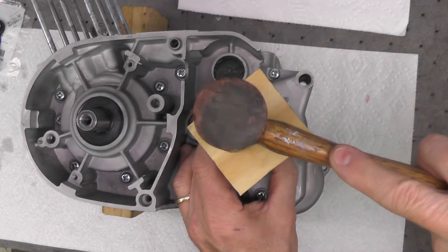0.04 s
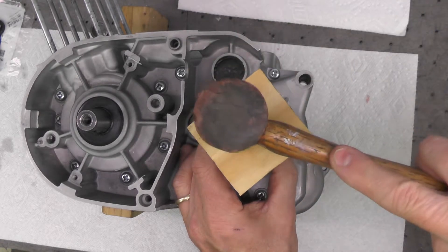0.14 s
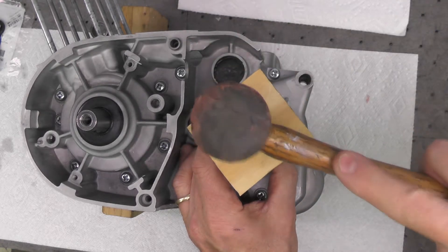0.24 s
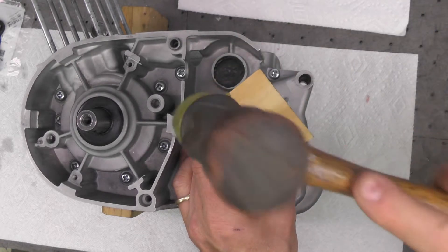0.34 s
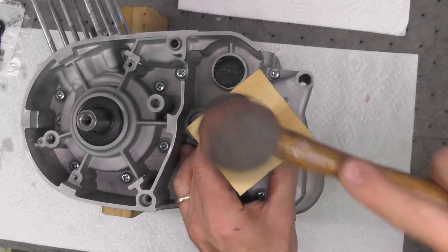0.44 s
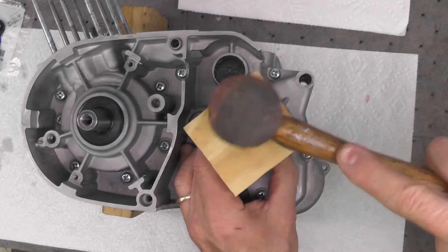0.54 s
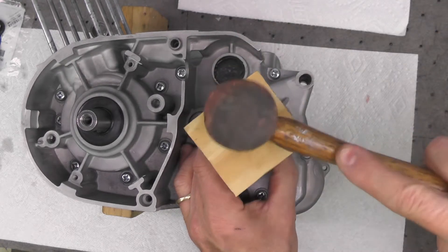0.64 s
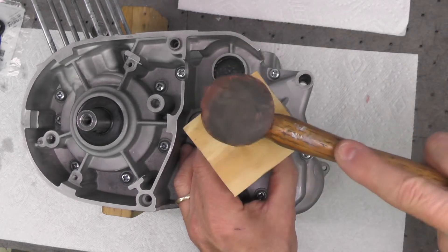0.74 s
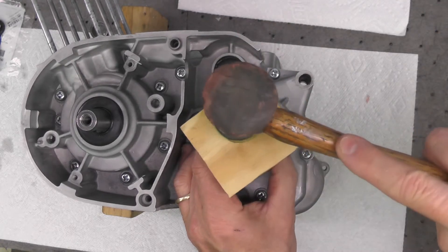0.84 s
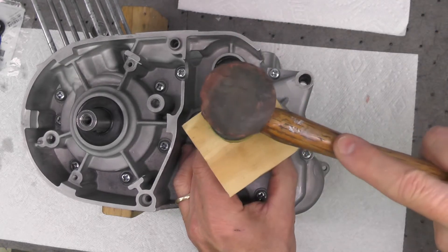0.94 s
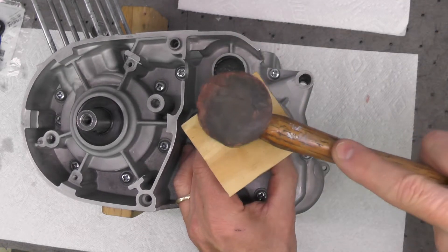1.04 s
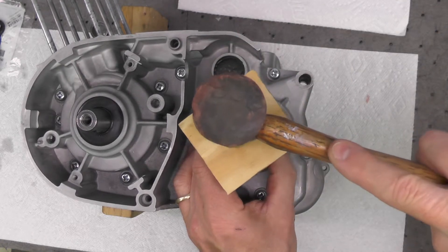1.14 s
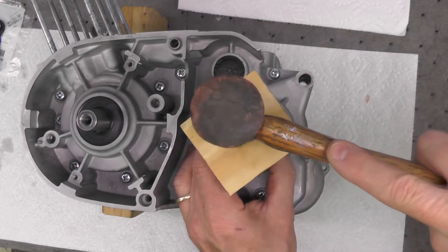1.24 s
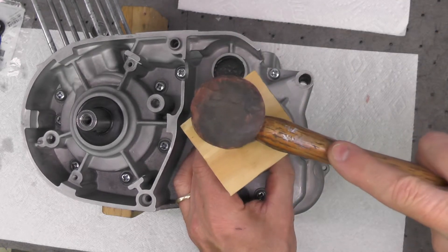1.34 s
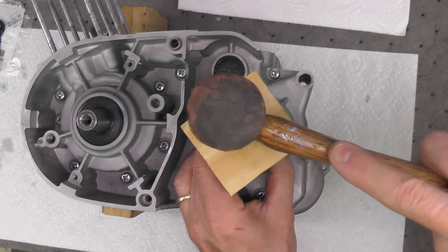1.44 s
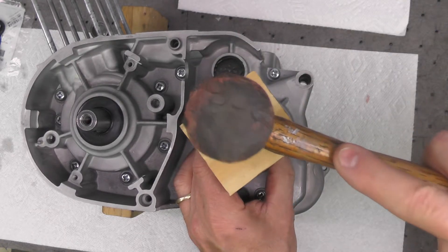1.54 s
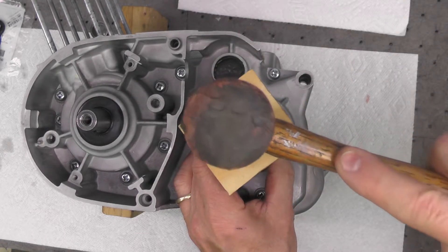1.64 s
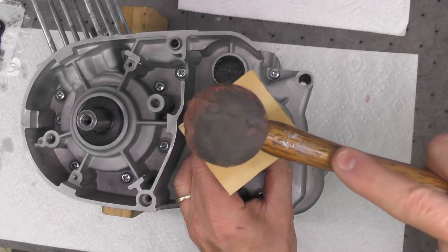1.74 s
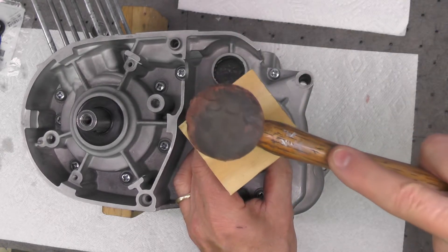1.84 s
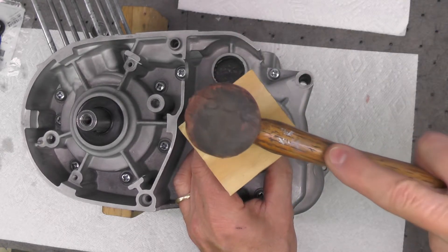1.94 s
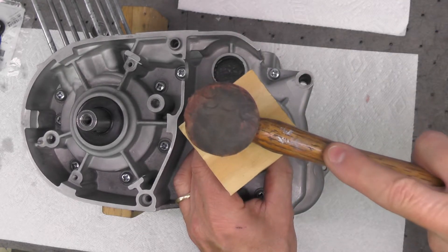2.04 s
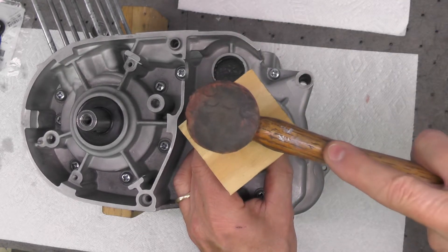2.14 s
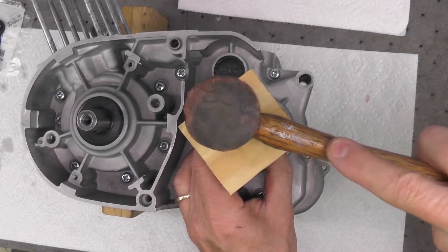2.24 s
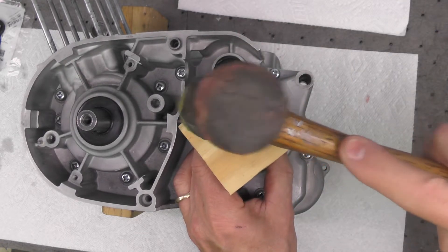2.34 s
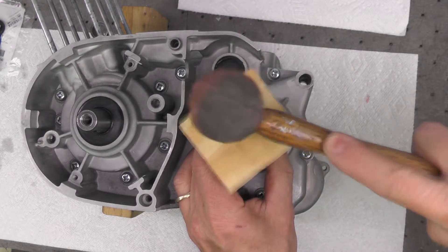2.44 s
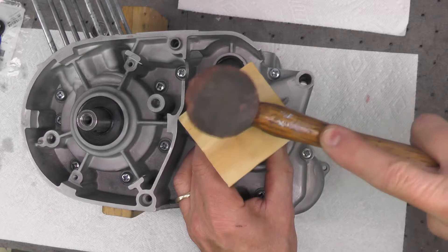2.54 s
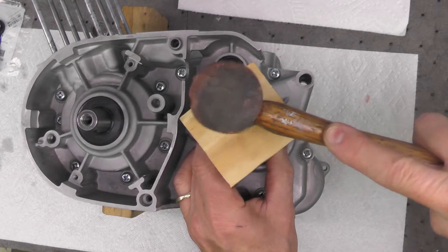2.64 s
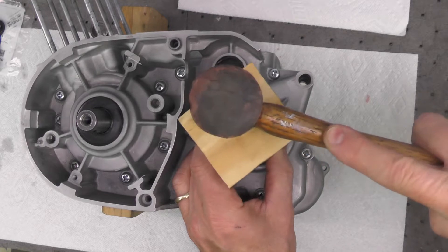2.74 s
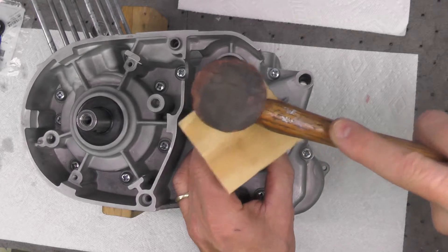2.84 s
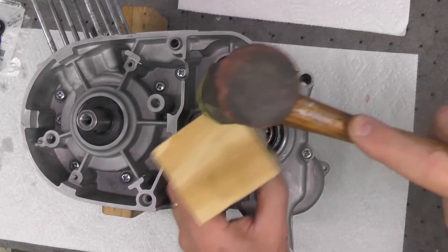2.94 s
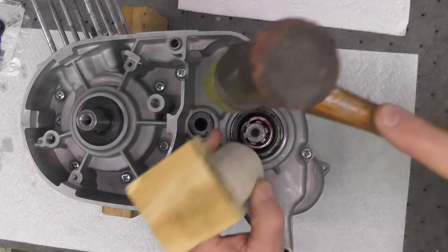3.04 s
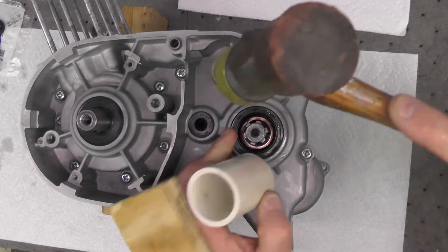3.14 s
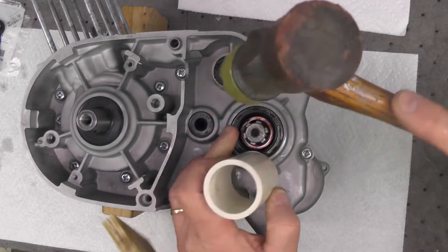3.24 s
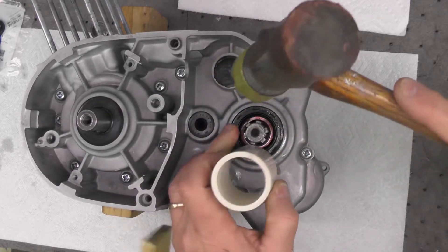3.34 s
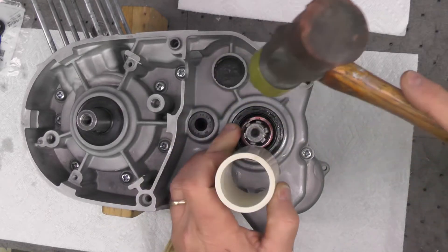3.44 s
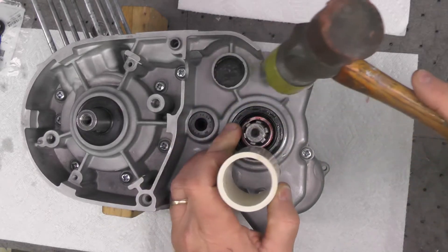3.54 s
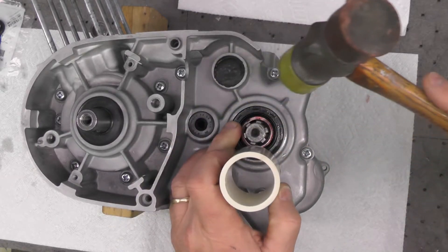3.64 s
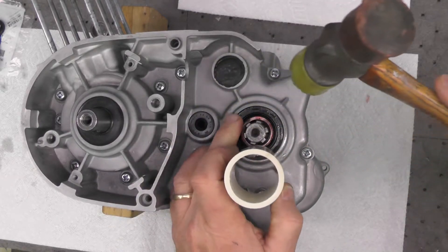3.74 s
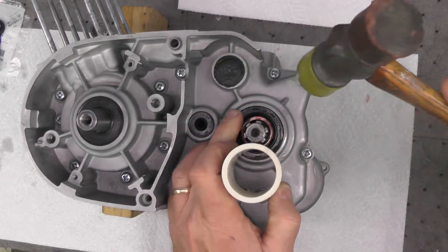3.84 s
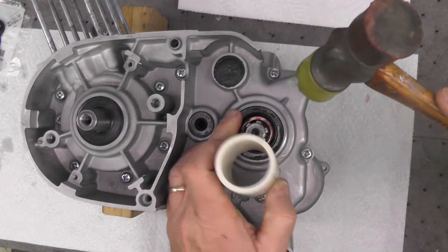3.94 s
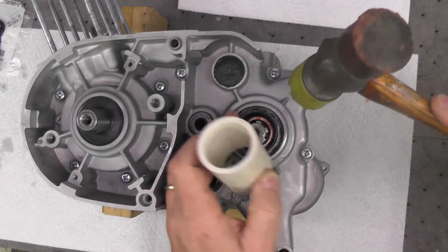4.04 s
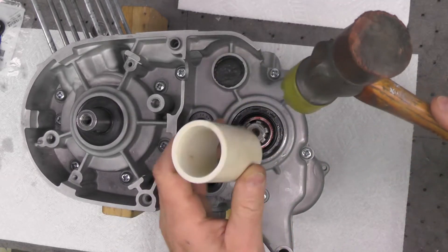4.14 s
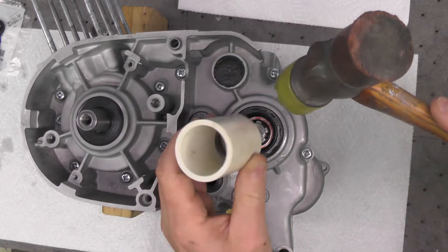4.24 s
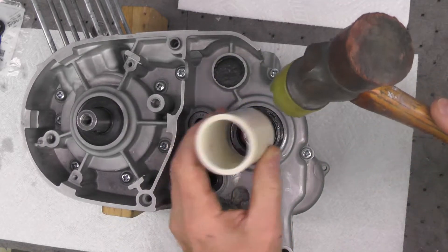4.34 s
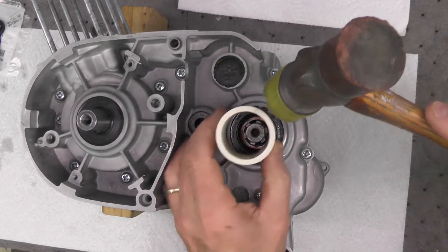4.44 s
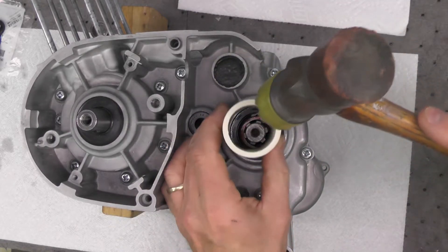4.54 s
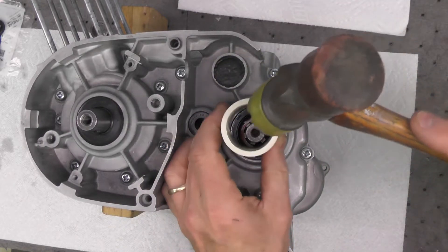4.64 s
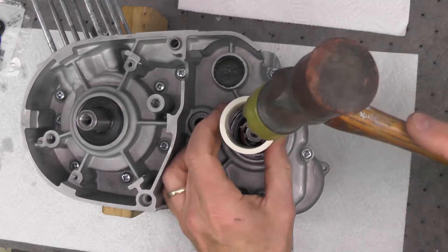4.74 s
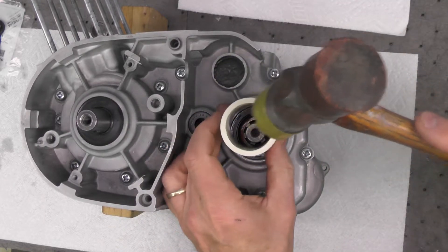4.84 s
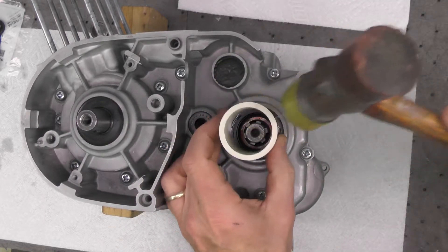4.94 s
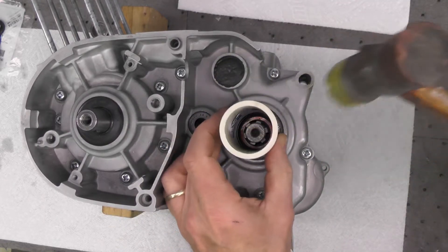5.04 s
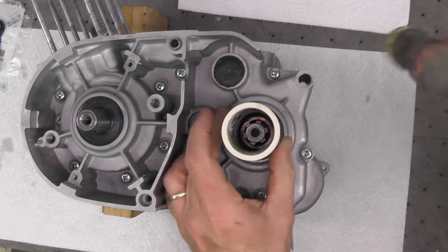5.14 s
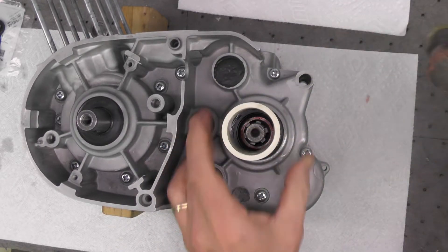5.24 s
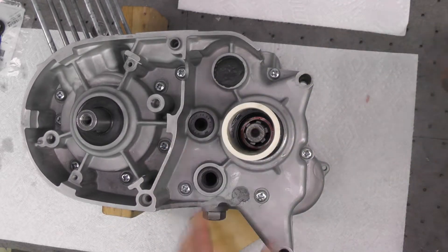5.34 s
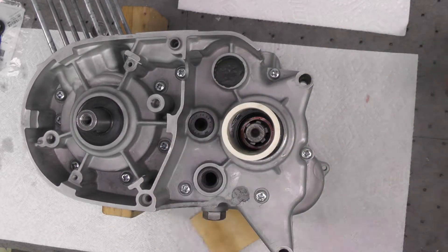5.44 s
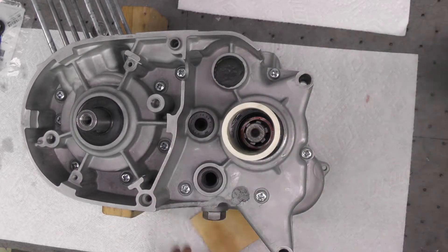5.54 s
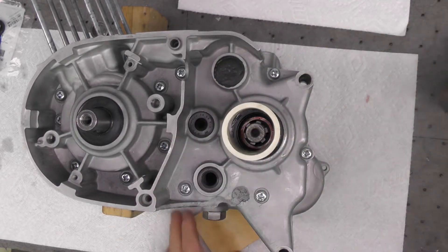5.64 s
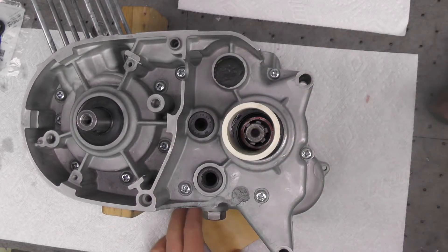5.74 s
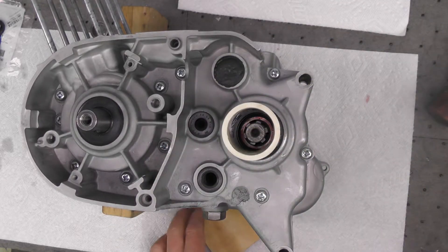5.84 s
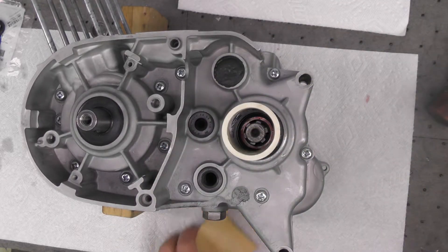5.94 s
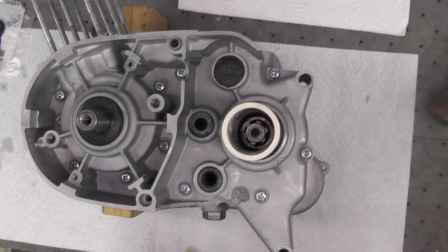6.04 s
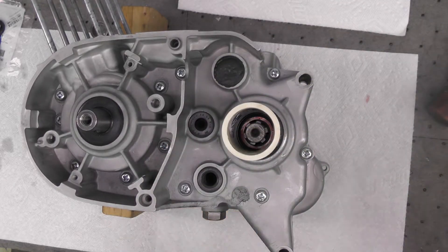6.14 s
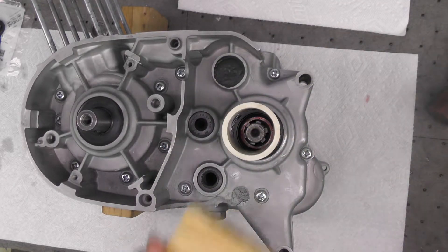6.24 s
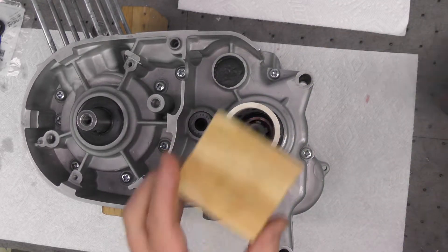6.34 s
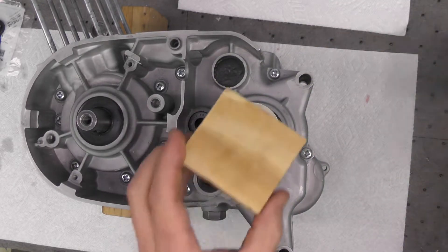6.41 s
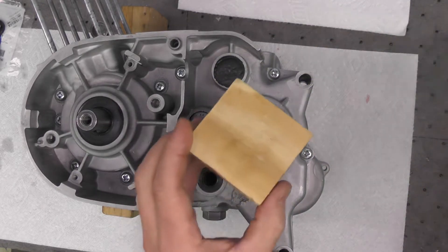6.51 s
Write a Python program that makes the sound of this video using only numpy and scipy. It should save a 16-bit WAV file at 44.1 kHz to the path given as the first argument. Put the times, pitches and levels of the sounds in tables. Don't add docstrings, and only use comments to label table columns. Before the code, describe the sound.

Sharp, chattering mallet strikes through wood onto cast metal, followed by a dropped block, hollow tube taps and faint rustles in a quiet, humming room.

```python
import sys
import numpy as np
from scipy import signal
from scipy.fft import rfft, irfft
from scipy.io import wavfile
from scipy.ndimage import uniform_filter1d

SR = 44100
rng = np.random.default_rng(int(sys.argv[2]) if len(sys.argv) > 2 else 0)


def to_wav(sig):
    pcm = np.clip(np.atleast_2d(sig), -1, 1) * 32767
    pcm = np.round(pcm).astype(np.int16)
    wavfile.write(sys.argv[1], SR, pcm.T)


def volts(x):
    e = np.asarray(x, float) / 20
    return 10 ** e


N = 289945


def evened(x):
    return x / np.sqrt(np.mean(x ** 2) + 1e-20)


def read(points, hz):
    f, value = np.transpose(points)
    return np.interp(np.log(hz + 1), np.log(f + 1), value)


def add(mix, s, sound):
    part = mix[max(round(s * SR), 0):][:len(sound)]
    part += sound[:len(part)]


def coloured(x, points):
    hz = np.fft.rfftfreq(x.shape[-1], 1 / SR)
    return irfft(rfft(x) * volts(read(points, hz)), x.shape[-1])


def band(x, hz, width):
    b, a = signal.iirpeak(min(hz, .45 * SR), hz / width, SR)
    return signal.lfilter(b, a, x)


def struck(modes, contact_ms, spread, count=14000):
    t = np.arange(count) / SR
    luck = rng.standard_normal((len(modes), 3))
    hz, db, t60 = np.transpose(modes)[:, :, None]
    waves = np.sin(2 * np.pi * hz * (1 + .003 * luck[:, 1:2]) * t) * np.sign(luck[:, 2:])
    ring = (volts(db + spread * luck[:, :1] - 60 * t / t60) * waves).sum(0)
    u = np.arange(400) / (SR * max(contact_ms, .03) / 1000)
    push = np.sin(np.pi * np.minimum(u + .1, 1))
    out = signal.oaconvolve(ring, push)[:count]
    return out / abs(out).max()


def crack(colour, t60):
    t = np.arange(8192) / SR
    grit = rng.standard_normal(len(t)) * volts(5 * rng.standard_normal(len(t)))
    return volts(-60 * t / t60) * evened(coloured(grit, colour))


def puff(colour):
    pulse = coloured(np.arange(1024) == 150, colour)
    return 10 * pulse / np.linalg.norm(pulse)


def boom(db, contact_ms):
    # [f/Hz, level/dB, t60/s]
    bench_modes = [(91.5, 1.5, 0.26), (95, -13.5, 0.19), (122.6, -7, 0.16), (151.6, -13.5, 0.32),
                   (215, -17, .12), (42, -17.5, 0.052)]
    t = np.arange(SR // 2) / SR
    hz, mode_db, t60 = np.transpose(bench_modes)[:, :, None]
    rise_s = 0.0077
    swell = 1 - np.exp(-(t / rise_s) ** 2)
    rings = volts(mode_db - 60 * t / t60) * np.sin(2 * np.pi * hz * (t - .001))
    bench = -swell * (rings * volts(-30 * hz * contact_ms / 1000)).sum(0)
    return volts(db) * bench / abs(bench).max()


def knock(db, contact_ms, spread):
    # [f/Hz, level/dB, t60/s]
    knock_modes = [(210, -10.5, 0.061), (306, -8, 0.032), (364, -6, 0.093), (430, -6.5, 0.11),
                   (498, -6.5, 0.057), (565.7, -1, 0.042), (634.5, -10.5, 0.06), (750, -4.5, .03),
                   (850, -14, 0.071), (1310, -2.5, 0.023), (1545, -6.5, 0.045), (2600, -7, .01)]
    # [f/Hz, level/dB]
    dull = [(100, -14.5), (220, -2), (350, 1), (650, -0.5), (850, -8.5), (1400, -13), (2500, -22.5),
            (6000, -41.5)]
    near = volts(db) * struck(knock_modes, contact_ms, spread, count=6000)
    walls = volts(-12.5) * near
    add(walls, 0, volts(db - 3.5) * puff(dull))
    return near, walls


def workshop():
    # [f/Hz, level/dB per Hz]
    air_colour = [(45, 0.5), (80, -3.5), (150, -4.5), (260, 4), (450, -0.5), (900, -4.5), (1600, -9.5),
                  (2500, -11.5), (4500, -11), (6000, -20), (10000, -22), (14500, -17), (15800, -23),
                  (16500, -37.5)]
    # [f/Hz, likeness 0 to 1]
    air_same = [(60, 0.44), (180, 0.57), (550, 0.87), (1650, 0.97), (4970, 0.95), (15000, 0.35)]
    # [f/Hz, width/Hz, lift/dB]
    ducts = [(1285, 160, 5), (1930, 140, 3.5), (3020, 200, 3.5), (4100, 330, 0), (4950, 120, 1.5)]
    # [f/Hz, level/dB, starting phase/turns]
    hum_tones = [(106.1, -69, 0.3), (120, -65.5, 0.53), (248.3, -73.5, 0.083), (332, -80.5, 0.1),
                 (1260, -80, 0.1), (1893, -84, 0.1)]
    frames, hz, t = N // 256 + 5, np.fft.rfftfreq(1024, 1 / SR), np.arange(N) / SR
    a, b, c, d, patches = rng.standard_normal((frames, 513, 5)).T
    patches = evened(uniform_filter1d(uniform_filter1d(patches, 12, 0), 10, 1))
    same = read(air_same, hz)[:, None]
    left = a + 1j * b
    right = same * left + np.sqrt(1 - same ** 2) * (c + 1j * d)
    whistle_db = sum(db * np.exp(-((hz - f) / width) ** 2) for f, width, db in ducts)
    z = np.array([left, right]) * volts((read(air_colour, hz) + whistle_db)[:, None] + .8 * patches)
    air = volts(-64.5) * evened(signal.istft(z, nperseg=1024, noverlap=768)[1][:, :N])
    hum = sum(volts(db) * np.sqrt(2) * np.sin(2 * np.pi * (f * t + turns)) for f, db, turns in hum_tones)
    return air + hum


def light_pushes():
    # [t/s, boom level/dB, knock level/dB, contact/ms]
    pushes = [
        (.001, -41, -35.5, 0.47),
        (1.332, -51, -45.5, 0.74),
        (1.843, -58.5, -49, .6),
        (2.183, -38.5, -30, 0.13),
        (3.765, -51, -38.5, 1.8),
        (4.577, -56, -72.5, 2.4),
        (5.636, -36.5, -66, 4.4),
        (5.843, -30, -40, 1.96),
    ]
    # [f/Hz, level/dB]
    thud = [(100, -21), (600, 3), (2000, 6), (3500, -2), (6000, -20), (9000, -33), (16000, -52.5)]
    out, body, walls = np.zeros((3, N))
    for s, boom_db, knock_db, contact_ms in pushes:
        near, sent = knock(knock_db, contact_ms, 1.7)
        add(out, s, boom(boom_db, contact_ms))
        add(body, s, near)
        add(walls, s, sent)
        add(out, s, volts(knock_db + 1 - 16.5 * contact_ms) * crack(thud, 0.0088))
    return out + body, out + walls


def touches():
    # [t/s, level/dB, f/Hz, octave level/dB, upper tones level/dB]
    hollow_notes = [(.001, -30.5, 380.7, -8, -6.5), (0.028, -54, 394, -27, -16),
                    (1.205, -45.5, 430, -4, -25.5), (1.334, -46, 362, -25, -20),
                    (1.845, -37.5, 401, -5.5, -25), (2.183, -28.5, 420.6, -19, 6.5),
                    (2.2205, -34, 1355, -30.5, -30), (2.2205, -40.5, 479, -25.5, -25),
                    (3.2535, -44.5, 300, -2, -6), (4.075, -51.5, 589, 28, -22.5),
                    (4.546, -51, 430, -15, -13), (5.41, -53, 492, -25.5, -26),
                    (5.845, -30.5, 280, -14.5, -21), (5.844, -32.5, 210, -6.5, -32),
                    (6.13, -57, 470, -26.5, -25.5)]
    out, t = np.zeros(N), np.arange(8000) / SR
    ring_cycles = 25
    for s, note_db, note_hz, octave_db, upper_db in hollow_notes:
        for k, db in ((1, 0), (1.95, octave_db), (3.9, upper_db), (6.2, upper_db - 2)):
            hz = k * note_hz
            swell, spent = 1 - np.exp(-t * hz / 1.2), t * hz / ring_cycles
            level_db = note_db + db - 1 - 30 * spent - 30 * spent ** 2
            add(out, s, volts(level_db) * swell * np.sin(2 * np.pi * hz * t))
    return out


def clock():
    # [f/Hz, width/Hz, level/dB]
    case_bands = [(2900, 250, 13), (4130, 700, 12), (5000, 570, -2.5), (6597, 1300, -32.5)]
    first_tick_s, stop_late_s = .288, .019
    release_db, stop_db, uneven_db = -57, -60, -0.76
    out, t = np.zeros(N), np.arange(4000) / SR
    for second in range(N // SR + 1):
        for late, db in ((0, release_db), (stop_late_s, stop_db)):
            grit = rng.standard_normal(len(t))
            case = sum(volts(g) * band(grit, hz, width) for hz, width, g in case_bands)
            level_db = db + uneven_db * rng.standard_normal() - 60 * t / .1
            tick = volts(level_db) * np.minimum(t / .003, 1) * evened(case)
            add(out, first_tick_s + second + late, tick)
    return out


def hard_blows():
    # [t/s, clatter level/dB, rattle length/s, steel level/dB, boom level/dB]
    blows = [
        (0.5601, -5.5, .017, -20, -14),
        (2.547, -6, .0125, -24.5, -11.5),
    ]
    # [f/Hz, level/dB per Hz]
    clatter = [(350, -27.5), (600, -5), (988, -17), (1230, -5.5), (1560, -11.5), (2090, -17.5), (2470, -9),
               (3350, -3), (3490, -2), (5510, -8), (13400, -11), (15800, -15.5), (16500, -40.5)]
    # [f/Hz, level/dB, t60/s]
    steel = [(11870, 0, .26), (12400, -5, .08), (13040, -3, .12), (14300, -8, .1), (14800, -1, .25)]
    out, rattle, body, walls = np.zeros((4, N))
    contacts, settles = 5, 3
    share, step = np.linspace(0, 1, contacts), np.arange(settles)
    fall_db = np.append(-3 * share, -10 - 7 * step)
    dying = np.repeat([0.0069, 0.017], [contacts, settles])
    knock_db, contact_ms = -7.5, 0.29
    knock_late_s, boom_late_s, settle_gap_s = .0044, 0.0063, .0065
    for s, clatter_db, rattle_s, steel_db, boom_db in blows:
        lates = np.append(rattle_s * share, rattle_s + settle_gap_s * (2 ** (step + 1) - 1))
        for late, db, fading in zip(lates, clatter_db + fall_db, dying):
            add(rattle, s + late, volts(db) * crack(clatter, 3 * fading))
            add(out, s + late, volts(db + steel_db) * struck(steel, 0.039, 1.5))
        near, sent = knock(knock_db, contact_ms, 1.8)
        add(body, s + knock_late_s, near)
        add(walls, s + knock_late_s, sent)
        add(walls, s, volts(clatter_db + 3.5) * puff(clatter))
        add(out, s + boom_late_s, boom(boom_db, contact_ms))
    return out + rattle + body, out + volts(-8) * rattle + walls


def rustles():
    # [t/s, level/dB, centre f/Hz, length/s]
    clinks = [(4.072, -51, 9200, 0.011), (4.126, -57, 9240, 0.028), (4.235, -61.5, 5630, .028),
              (4.245, -69, 11700, 0.015), (4.378, -69.5, 5600, .016), (4.541, -55, 9100, 0.007),
              (6.38, -69.5, 2515, 0.086), (6.506, -65, 5000, .01)]
    # [t/s, level/dB, centre f/Hz, length/s]
    brushes = [(2.897, -64.5, 11900, .01), (3.135, -62, 10500, 0.014), (3.991, -64.5, 11000, .008),
               (4.108, -66.5, 13500, .049), (4.528, -66.5, 12000, .02), (5.771, -65.5, 2800, 0.11),
               (5.82, -64, 10930, .005), (5.925, -62, 3500, 0.053)]
    # [t/s, level/dB, centre f/Hz, length/s]
    crackles = [(3.759, -63, 3970, .015), (5.496, -68, 5000, 0.016), (5.844, -60, 5910, 0.00595),
                (5.915, -68.5, 6840, 0.049), (5.99, -67.5, 8800, .015), (6.154, -71, 8030, 0.033),
                (6.445, -71, 7970, 0.037)]
    out, t = np.zeros(N), np.arange(6000) / SR
    for rows, width in ((clinks, 0.074), (brushes, .48), (crackles, 1.6)):
        for s, db, hz, length in rows:
            grit = rng.standard_normal(len(t)) * volts(1.34 * rng.standard_normal(len(t)))
            grain = band(band(grit, hz, width * hz), hz, 1.5 * width * hz)
            shape = np.minimum(t / (0.085 * length), 1) * np.exp(-(t / length) ** 2)
            add(out, s, volts(db) * shape * evened(grain))
    return out


def tube():
    # [f/Hz, level/dB, t60/s]
    tube_modes = [(810.7, -4.5, 0.05), (1209.4, -1.5, .04), (1420, 1.5, 0.025), (1516, 0, 0.028),
                  (1797, -12.5, 0.015), (3020, -9, 0.012), (4110, -8.5, .015), (6007, -2.5, 0.043),
                  (7150, -4.5, 0.01894), (8885, -6, .015), (10400, 1, .02)]
    # [t/s, ring level/dB, contact/ms]
    taps = [
        (3.186, -57, 0.044),
        (3.194, -63, 0.025),
        (3.253, -19, 0.18),
        (3.316, -50, 0.072),
        (4.076, -36.5, 0.11),
        (4.466, -67, 0.038),
        (4.508, -57.5, .17),
        (4.545, -46.5, 0.19),
    ]
    # [start t/s, hardest t/s, end t/s, level/dB]
    drags = [
        (3.09, 3.152, 3.205, -55.5),
        (4.505, 4.532, 4.56, -63),
    ]
    # [f/Hz, level/dB]
    snap = [(400, -24), (1500, -2.5), (2500, -2), (4500, -5), (8000, -11), (12000, -16), (13500, -34.5),
            (16500, -30.5)]
    (out, walls), t = np.zeros((2, N)), np.arange(N) / SR
    even_ms = 0.15
    for s, db, contact_ms in taps:
        snap_db = db - 7.5 * np.log2(contact_ms / even_ms)
        add(walls, s, volts(db - 24) * puff(snap))
        add(out, s, volts(db) * struck(tube_modes, contact_ms, 0.57, count=6000))
        add(out, s, volts(snap_db) * crack(snap, 0.0098))
    slips = rng.standard_normal(N) * (rng.random(N) < 3000 / SR)
    rubbed = evened(sum(volts(db) * band(slips, hz, 2.2 / t60) * t60 ** 0.73 for hz, db, t60 in tube_modes))
    rubbed = rubbed + evened(band(slips, 1300, 94))
    for start, hardest, end, db in drags:
        press_db = np.interp(t, [start, hardest, end], [-14, 0, -14], -90, -90)
        out += volts(db + press_db) * rubbed
    return out, walls


def block():
    # [t/s, level/dB, contact/ms]
    landings = [
        (3.4733, -10, 0.1),
        (3.4768, -5, 0.27),
        (3.4793, -6.5, 0.7),
        (3.507, -20.5, 1.0),
        (3.548, -25, 1.0),
    ]
    # [f/Hz, level/dB, t60/s]
    block_modes = [(50.3, -12.5, 0.037), (158, -30.5, 0.0318), (206, -6.5, 0.076), (300, -6.5, 0.0404),
                   (376, 1, 0.037), (411.6, -21.5, 0.023), (514, -7, 0.01274), (620, -0.5, 0.017),
                   (761, -0.5, 0.048), (813, -4.5, 0.0263), (1000, -24, 0.016), (1260, 5, 0.017),
                   (1627, -10, 0.012), (2360, -16, 0.0071)]
    # [f/Hz, level/dB]
    slap = [(200, -6), (1500, -1.5), (3300, -3.5), (5000, -15.5), (9000, -19.5), (14000, -18),
            (16500, -33.5)]
    # [f/Hz, level/dB]
    far_side = [(60, -17.5), (200, 6.5), (400, 4), (750, 3.5), (1300, -4.5), (2500, -17.5), (5000, -29.5),
                (9000, -39.5)]
    out, walls = np.zeros((2, N))
    for s, db, contact_ms in landings:
        add(out, s, volts(db) * struck(block_modes, contact_ms, 1.2, count=6000))
        add(out, s, volts(db - 16.5 - 9 * contact_ms) * crack(slap, 0.028))
        add(walls, s, volts(db - 17.5) * puff(far_side))
    return out, walls


def bench_echoes(x):
    # [f/Hz, level/dB]
    ports = [(30, -18), (150, -7), (500, 0), (2000, -4), (6000, -2), (14000, 6)]
    echoes = np.zeros(800)
    echoes[rng.integers(4, 800, 40)] = rng.choice([-1., 1.], 40)
    fade = volts(-60 * np.arange(800) / SR / .03)
    side = signal.oaconvolve(x, echoes * fade)[:N]
    return volts(-23) * coloured(side, ports) * [[1], [-1]]


def room(x):
    # [f/Hz, t60/s]
    room_t60 = [(100, 0.6), (260, 0.71), (700, 0.7), (1840, 0.66), (4850, 0.68), (8000, 0.5), (11000, 0.22),
                (14000, 0.1)]
    # [f/Hz, level/dB]
    room_colour = [(60, -15.5), (150, -3), (400, 8.5), (900, -3.5), (1500, 0.5), (2200, -4), (3000, -2),
                   (4400, 1.5), (5500, -1.5), (9000, -6), (12000, -7), (16000, -10)]
    echoes = np.zeros((2, SR))
    at = np.arange(300, SR - 20, 20) + rng.integers(0, 20, (2, (SR - 301) // 20))
    np.put_along_axis(echoes, at, rng.choice([-1., 1.], at.shape), 1)
    same = .8
    echoes[1] = same * echoes[0] + np.sqrt(1 - same ** 2) * echoes[1]
    hz, t, z = signal.stft(echoes, SR, nperseg=512)
    z = z * volts(read(room_colour, hz)[:, None] - 60 * t / read(room_t60, hz)[:, None])
    tail = signal.istft(z, SR, nperseg=512)[1]
    return signal.fftconvolve(x[None], tail / np.linalg.norm(tail[0]), axes=1)[:, :N]


def scene():
    pushed, push_walls = light_pushes()
    hit, hit_walls = hard_blows()
    taps, snaps = tube()
    fallen, fall_walls = block()
    far = clock()
    light = touches() + taps + rustles()
    near = pushed + hit + light
    dry = near * volts([[-.2], [.2]]) + fallen * volts([[.3], [-.3]]) + far
    dry = dry + bench_echoes(near + fallen + far)
    sent = volts(-10.5) * (push_walls + hit_walls) + volts(-23.5) * (light + fallen)
    sent = sent + snaps + fall_walls + volts(-12.5) * far
    return dry + room(sent) + workshop()


def ghost(x):
    # [f/Hz, level/dB]
    smear = [(50, -53), (800, -28.5), (2500, -17.5), (8000, -15.5), (16000, -14.5)]
    lead = 467
    padded = np.pad(x, ((0, 0), (lead, 0)))
    hz, _, z = signal.stft(padded, SR, "cosine", nperseg=2048, noverlap=1024)
    size = uniform_filter1d(abs(z), size=9, axis=1) * volts(read(smear, hz))[:, None]
    z = size * np.exp(2j * np.pi * rng.random(z.shape[1:]))
    return signal.istft(z, SR, "cosine", nperseg=2048, noverlap=1024)[1][:, lead:lead + N]


def top_cut(x):
    return signal.sosfilt(signal.butter(12, 16640, fs=SR, output="sos"), x)


def record(dry):
    cut = signal.sosfilt(signal.butter(2, 35, "high", fs=SR, output="sos"), dry)
    held = .77 * np.tanh(cut / .77)
    return top_cut(held + ghost(held))


dry = scene()
out = record(dry)
to_wav(out)
```